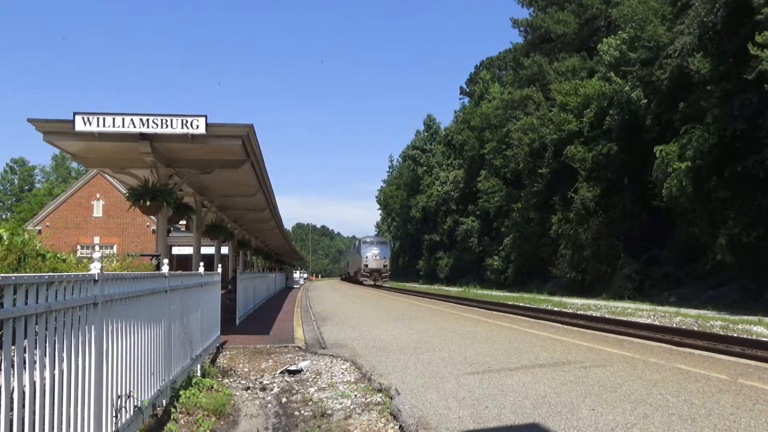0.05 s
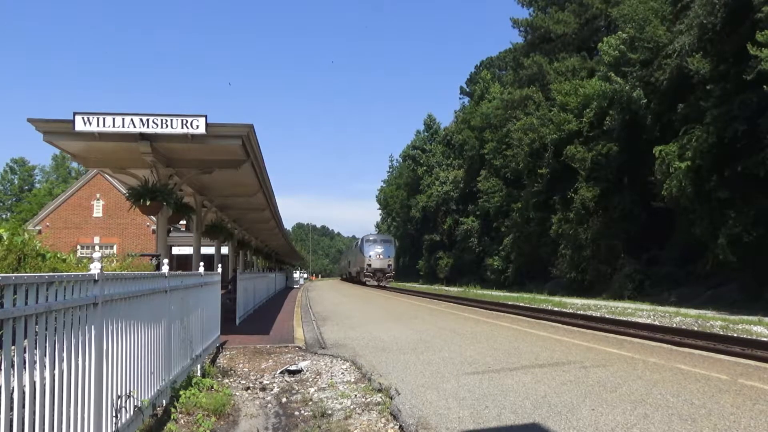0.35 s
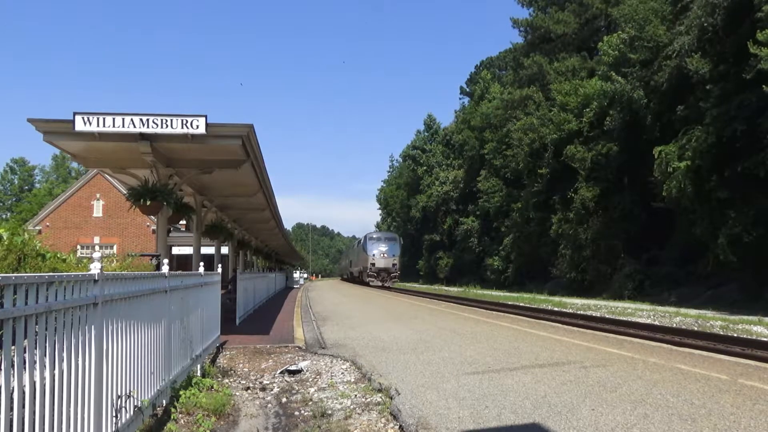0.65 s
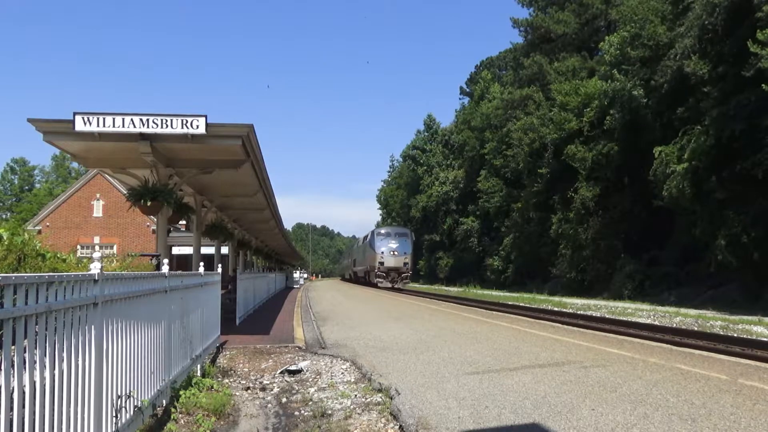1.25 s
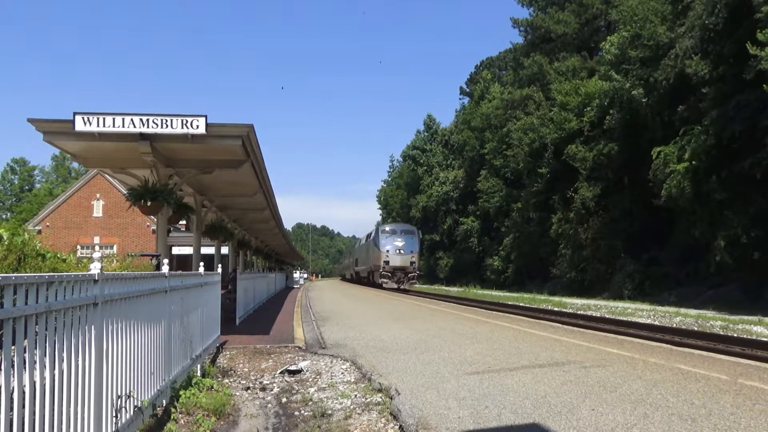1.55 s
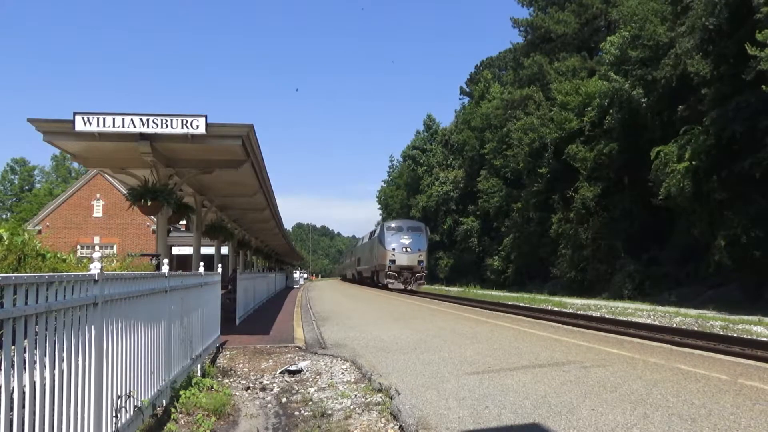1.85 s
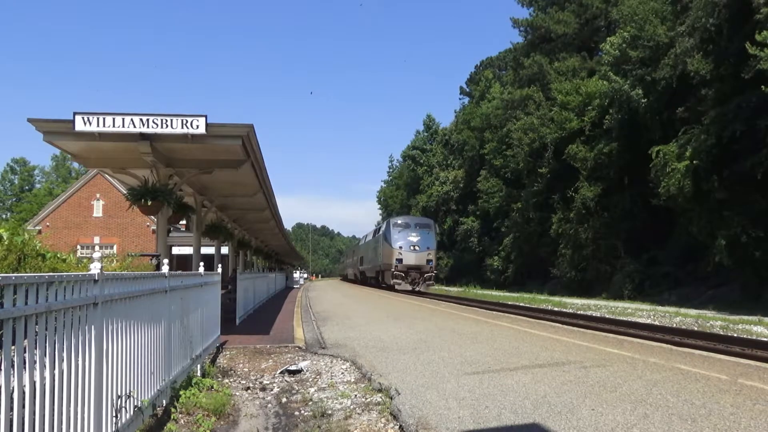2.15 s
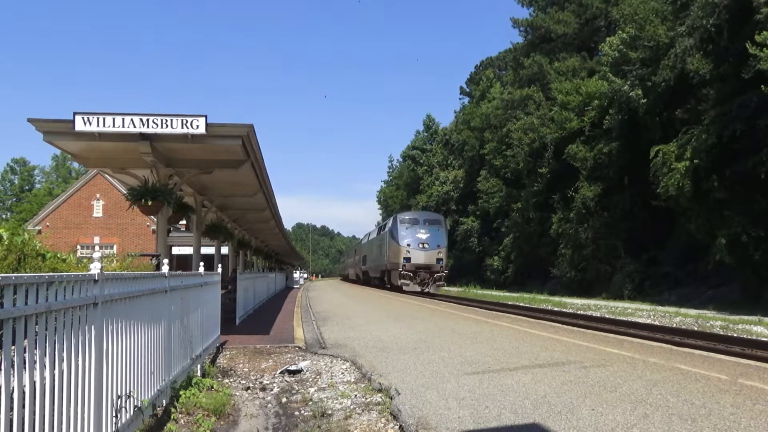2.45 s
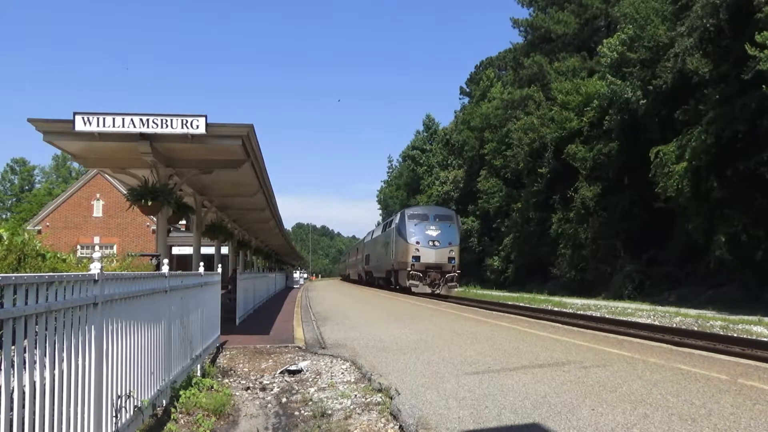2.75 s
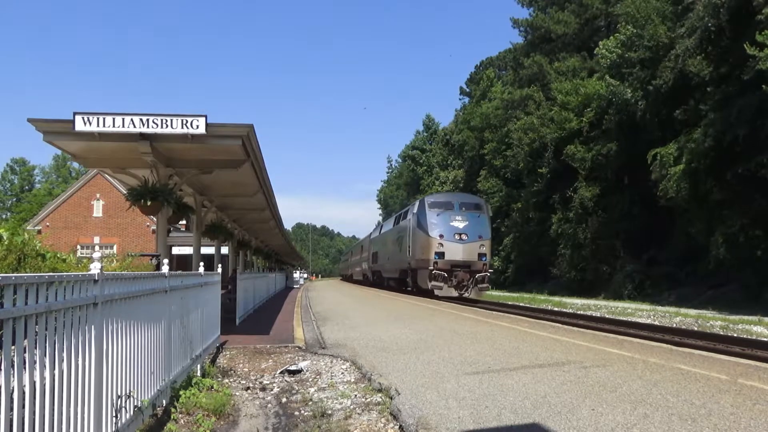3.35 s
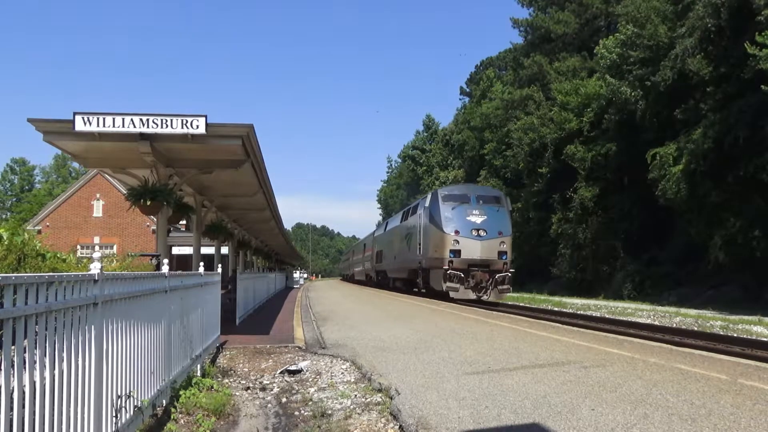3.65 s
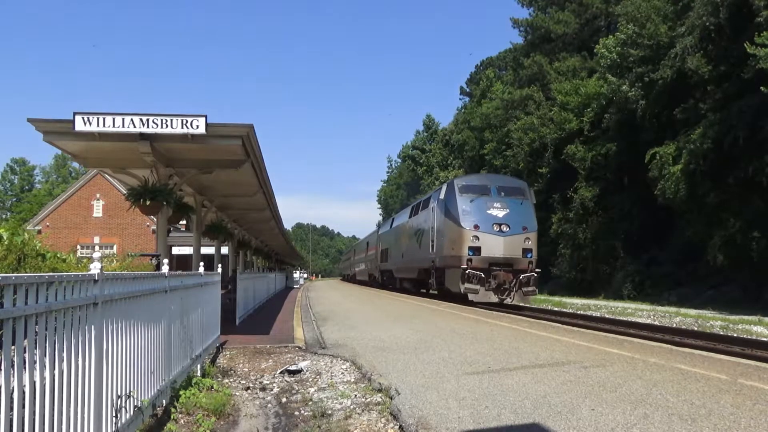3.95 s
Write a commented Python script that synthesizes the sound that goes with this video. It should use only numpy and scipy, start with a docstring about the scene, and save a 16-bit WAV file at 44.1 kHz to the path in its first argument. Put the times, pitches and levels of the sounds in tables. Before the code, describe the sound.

A locomotive bell, already ringing, strikes evenly at about 0.4, 1.2, 1.9, 2.6 and 3.4 seconds, each bright note followed by a slightly lower echo. Beneath it, the approaching train's diesel engine throbs and wheels rumble. Faint air puffs come from 1.4 seconds as a thin, high whine fades, and a wheel squeaks briefly at 1.8. Near 4 seconds the rails hiss louder and the bell's pitch sinks slightly.

```python
"""A diesel locomotive rolls towards a platform, its bell already ringing over the throb of the engine,
the rumble of wheels and the hiss of rails. An air-driven clapper strikes evenly: each note arrives
raised in pitch by the approach, then trees and station throw it back later and lower.
From 1.4 s come a few faint puffs of air; a thin whine fades, and at 1.8 s a wheel squeaks.
Towards the end the rails hiss louder and the bell sinks slightly in pitch as the track angles past."""
import sys
import numpy as np
from scipy import signal
from scipy.fft import rfft, irfft
from scipy.io import wavfile
from scipy.ndimage import uniform_filter1d

SR = 44100
rng = np.random.default_rng(int(sys.argv[2]) if len(sys.argv) > 2 else 0)


def wav_out(sig):
    """Save sig, one row per channel (or a flat mono array), as 16-bit PCM at SR to the path in sys.argv[1]."""
    wavfile.write(sys.argv[1], SR, np.round(np.clip(np.atleast_2d(sig).T, -1, 1) * 32767).astype(np.int16))


N = 176400
T = np.arange(N) / SR
HZ = np.fft.rfftfreq(N, 1 / SR)


def amp(db):
    """Amplitude ratio of a level in decibels."""
    return 10 ** (np.asarray(db) / 20)


def unit(x):
    """Normalisation to an rms of one."""
    return x / np.sqrt(np.mean(abs(x) ** 2) + 1e-20)


def over_hz(points):
    """Interpolation on a log-frequency axis."""
    f, value = np.transpose(points)
    return np.interp(np.log(HZ + 1), np.log(f + 1), value)


def over_time(points):
    """Linear interpolation at every sample."""
    return np.interp(T, *np.transpose(points))


def noise(gain):
    """Spectral shaping: white noise filtered by a gain at each frequency, at unit rms."""
    return unit(irfft(rfft(rng.standard_normal(N)) * gain, N))


def resonances(bands):
    """Resonance: noise confined to narrow peaks."""
    return sum(amp(db) * noise(1 / (1 + ((HZ - hz) / width) ** 2)) for hz, width, db in bands)


def drift(rate_hz):
    """Random modulation: low-passed complex noise wanders in amplitude and phase."""
    t = np.arange(0, N / SR + 1, 1 / 500)
    white = rng.standard_normal(len(t)) + 1j * rng.standard_normal(len(t))
    rolloff = 1 + (np.fft.fftfreq(len(t), t[1]) / rate_hz) ** 2
    return np.interp(T, t, unit(np.fft.ifft(np.fft.fft(white) / rolloff)))


def patchy(x, depth_db):
    """Selective fading: small patches of the spectrum swell and fade."""
    spectra = signal.stft(x, nperseg=1024)[2]
    field = uniform_filter1d(rng.standard_normal(spectra.shape), size=9, axis=0)
    field = unit(uniform_filter1d(field, size=7, axis=1))
    return unit(signal.istft(spectra * amp(depth_db * field), nperseg=1024)[1][:N])


# clapper blows: t/s, level/dB, bite (extra brightness)/dB, clank level/dB, factor on T60
STRIKES = [(-0.315, -6.5, 4.5, -36, 1.1), (0.422, -3.5, -1, -28, 1.18), (1.157, -1.5, -2.5, -24, 0.92),
           (1.889, -3, 1.5, -19, 1.4), (2.622, -0.5, -2, -20, 1.04), (3.356, -0.5, 0.5, -18, 0.89)]
# bell modes as heard at t = 0: f/Hz, direct level/dB, T60/s, echo level/dB, share of the bite
BELL_MODES = [(925, -28.5, 5.2, -32, 0), (1634, -37.5, 6, -45, 0.1), (1924, -13.5, 1.58, -26, 0.1),
              (2191, -20, 1.07, -18.5, 0.8), (3215, -23, 0.55, -31.5, 0.8), (3788, -18, 1.12, -24.5, 0.5),
              (5494, -32, 0.67, -27, 0.2), (5810, -20, 0.78, -25, 1), (6890, -24.5, .55, -34.5, .4),
              (8090, -22, 0.7, -28, 0.7), (10580, -26.5, 0.58, -32, 0), (13265, -37, 0.53, -41.5, .4)]
# echoes of sound sent sideways and backwards: frequency ratio to the direct sound, relative level/dB
ECHO_SPECTRUM = [(.925, -40), (.945, -17), (.951, -3), (.959, 0), (.978, -3), (1.0, -4), (1.012, -11),
                 (1.03, -18), (1.07, -40)]
def bell():
    """Damped modes with Doppler shift: each rings as a line, followed by a cloud of lower echoes."""
    attack_s, echo_rise_s, echo_hold_s = 0.012, 0.061, 0.11  # echo times for a T60 of 1 s
    doppler = 1 - .0062 * (T / T[-1]) ** 2  # the pitch falls as the track angles past
    bell_time = np.cumsum(doppler) / SR
    t = T[::32]
    starts, levels_db, bites_db, _, rings = np.transpose(STRIKES)[:, :, None]
    age = np.maximum(t - starts, 0)  # one row per blow
    distance = np.clip(1 - starts / 1.7, 0, 1)
    out = np.zeros(N)
    for hz, direct_db, t60, echo_db, share in BELL_MODES:
        absorption_db = -5 * distance * hz / 10000  # air takes less treble as the train nears
        force = amp(levels_db + share * bites_db + absorption_db)
        decay_rate = np.log(1000) / (t60 * rings)
        direct = force * np.minimum(age / attack_s, 1) * np.exp(-decay_rate * age)
        reach = t60 ** 0.58  # long-ringing modes come back from further away
        echo_rise = np.sqrt(np.minimum(age / (echo_rise_s * reach), 1))
        echo = force * echo_rise * np.exp(-decay_rate * np.maximum(age - echo_hold_s * reach, 0))
        flutter = unit(1 + 0.11 * np.sqrt(hz / 4000) * drift(rate_hz=14))
        line = (flutter * np.exp(2j * np.pi * hz * bell_time)).real
        ratio = HZ / (hz * doppler.mean())
        cloud = noise(amp(np.interp(ratio, *np.transpose(ECHO_SPECTRUM), left=-np.inf, right=-np.inf)))
        # overlapping blows add in energy
        out += amp(direct_db) * np.interp(T, t, np.linalg.norm(direct, axis=0)) * line
        out += amp(echo_db) * np.interp(T, t, np.linalg.norm(echo, axis=0)) * cloud
    return out


# spectrum of the clapper's impact: f/Hz, relative level/dB
CLANK_SPECTRUM = [(600, -41), (2000, 2), (5500, -1.5), (8500, 5), (11000, -7), (15500, -20)]
def clank():
    """Impact excitation: the clapper meets the metal with a short, bright, broadband crash."""
    rise_s, t60 = 0.011, 0.25
    envelope = np.zeros(N)
    for start, _, _, db, _ in STRIKES:
        age = np.maximum(T - start, 0)
        envelope += amp(db) * np.minimum(age / rise_s, 1) * np.exp(-np.log(1000) * age / t60)
    return envelope * noise(amp(over_hz(CLANK_SPECTRUM)))


# rate of the engine's working cycle: t/s, f/Hz
CYCLE_RATE = [(0, 7.73), (1.2, 7.73), (2.0, 7.708), (3.0, 7.68), (4, 7.668)]
# exhaust harmonics: multiple of the cycle rate -> level/dB
EXHAUST_ORDERS = {5: -40, 9: -30, 10: -36, 11: -27, 12: -27.5, 13: -21, 14: -29, 15: -32, 17: -34.5, 18:
                  -31.5, 19: -33.5, 20: -34, 21: -35, 22: -31.5, 23: -37, 26: -38, 27: -35, 29: -40, 30:
                  -41}
# swell of the exhaust: t/s, gain/dB
EXHAUST_SWELL = [(0, -1.5), (.55, 1), (.9, -2.5), (1.3, 2), (1.9, -3), (2.5, 1), (3.1, 2), (4, 0)]
# steady hums of the machinery: f/Hz, half-width/Hz, level/dB
HUMS = [(274.9, 4.4, -29), (451, 2.5, -40), (534, 31, -34.5)]
def engine():
    """Periodic excitation: the exhaust repeats each cycle, giving low harmonics under steady hums."""
    rate = over_time(CYCLE_RATE)
    first_beat_s = 0.02187
    cycles = np.cumsum(rate) / SR - first_beat_s * rate[0]
    exhaust = np.zeros(N)
    for order, db in EXHAUST_ORDERS.items():
        lag = .075 * order ** 2 / 2 + 0.27 * rng.random()  # higher lines come later, smearing the chug
        waver = unit(1 + .35 * drift(rate_hz=1.5))
        exhaust += amp(db) * np.sqrt(2) * (waver * np.exp(2j * np.pi * (order * cycles - lag))).real
    return exhaust * amp(over_time(EXHAUST_SWELL)) + resonances(HUMS)


# spectra of wheel rumble and rail hiss: f/Hz, relative level/dB
WHEEL_SPECTRUM = [(20, -26), (40, -13), (60, -8.5), (85, -2.5), (125, -2), (170, -0.5), (230, -4.5),
                  (300, -2.5), (420, -9), (650, -14), (1000, -16.5), (1400, -19), (2200, -19.5),
                  (3000, -28.5), (5000, -34), (10000, -49)]
RAIL_SPECTRUM = [(1500, -24), (3000, -6), (4400, -6.5), (5050, -4.5), (5400, -1.5), (5650, 3), (5950, -4),
                 (7000, -7.5), (7500, -6), (8300, -15.5), (10300, -16), (12000, -23.5), (15500, -47)]
# their envelopes: t/s, level/dB
WHEEL_LEVEL = [(0, -20), (.2, -20), (.35, -18), (.55, -20), (.8, -19), (1.15, -20), (1.42, -19), (1.7, -20),
               (2.45, -18), (2.8, -19.5), (3.3, -19.5), (4, -18.5)]
RAIL_LEVEL = [(0, -30.5), (1.2, -28.5), (2.3, -28.5), (3.5, -27), (3.8, -25), (4, -23.5)]
def rolling():
    """Rolling noise: wheels rumble, and the ringing rails hiss louder as the train nears."""
    rumble = patchy(noise(amp(over_hz(WHEEL_SPECTRUM))), depth_db=1.36)
    hiss = patchy(noise(amp(over_hz(RAIL_SPECTRUM))), depth_db=1.35)
    return rumble * amp(over_time(WHEEL_LEVEL)) + hiss * amp(over_time(RAIL_LEVEL))


# releases of air: t/s, duration/s, level/dB
PUFFS = [(1.437, 0.036, -49), (1.62, 0.39, -34), (2.378, 0.035, -37), (3.115, 0.028, -33.5),
         (3.845, 0.035, -29)]
# their spectrum: f/Hz, relative level/dB
PUFF_SPECTRUM = [(2000, -25), (5000, 4), (7000, 2), (10500, -3), (13000, -8), (16000, -21)]
def air_puffs():
    """Jet noise: escaping air hisses in faint puffs."""
    rise_s, fall_s = .012, 0.013
    envelope = np.zeros(N)
    for start, duration, db in PUFFS:
        rise = np.clip((T - start) / rise_s, 0, 1)
        envelope += amp(db) * rise * np.exp(-np.maximum(T - start - duration, 0) / fall_s)
    return envelope * noise(amp(over_hz(PUFF_SPECTRUM)))


# resonances of a squeaking wheel: f/Hz, half-width/Hz, level at the crest/dB
SQUEAK_MODES = [(3120, 55, -36), (6330, 110, -29.5)]
def wheel_squeak():
    """Resonance: a wheel sounds faintly and briefly in two narrow bands."""
    crest_s, width_s = 1.785, .035
    return resonances(SQUEAK_MODES) * np.exp(-((T - crest_s) / width_s) ** 2)


# envelope of the whine: t/s, level/dB
WHINE_LEVEL = [(0, -60), (1.45, -58), (1.7, -68), (4, -72)]
def whine(hz=15629):
    """A pure tone, thin and very high, that fades away."""
    return amp(over_time(WHINE_LEVEL)) * np.sqrt(2) * np.sin(2 * np.pi * hz * T)


# balance of the channels: f/Hz, left minus right level/dB
BALANCE = [(25, 5), (60, 1.9), (200, 1.6), (350, 1.6), (600, 0.4), (1000, 1.05), (1500, -1.35), (2000, .5),
           (2400, 0), (4700, 0), (5600, .3), (9000, 0.6), (12000, 0)]
# stereo width, the level of the left-right difference at each frequency: f/Hz, relative level/dB
STEREO_WIDTH = [(25, -16), (80, -24), (200, -20.5), (500, -23.5), (900, -27.5), (1500, -46), (2000, -27.5),
                (2600, -54), (4600, -59), (5300, -24), (7500, -16.5), (9000, -25), (12000, -44)]
def scene():
    """Mid-side stereo: the train is almost dead ahead; a weak left-right difference gives width."""
    ringing, motor = bell() + clank(), engine()
    mid = rfft(ringing + motor + air_puffs() + wheel_squeak() + whine() + rolling())
    canopy_delay_s = .023  # reflection off the platform canopy
    reflected = np.pad(ringing + motor, (round(canopy_delay_s * SR), 0))[:N]
    side = rfft(reflected + rolling()) * amp(over_hz(STEREO_WIDTH))
    lean = amp(over_hz(BALANCE) / 2)
    return irfft(np.array([mid * lean + side, mid / lean - side]), N)


def record(dry):
    """Soft saturation rounds off the highest peaks, then a low-pass filter limits the band."""
    knee, ceiling, cutoff_hz = .75, .97, 15780
    excess = np.maximum(abs(dry) - knee, 0)
    headroom = ceiling - knee
    soft = np.clip(dry, -knee, knee) + np.sign(dry) * headroom * np.tanh(excess / headroom)
    lowpass = signal.firwin(1023, cutoff_hz, window=("kaiser", 9), fs=SR)
    return signal.oaconvolve(soft, lowpass[None], "same")


dry = scene()
out = record(dry)
wav_out(out)
```